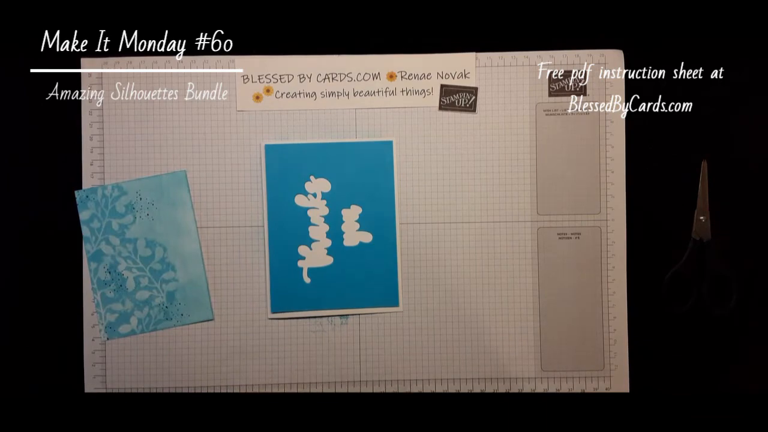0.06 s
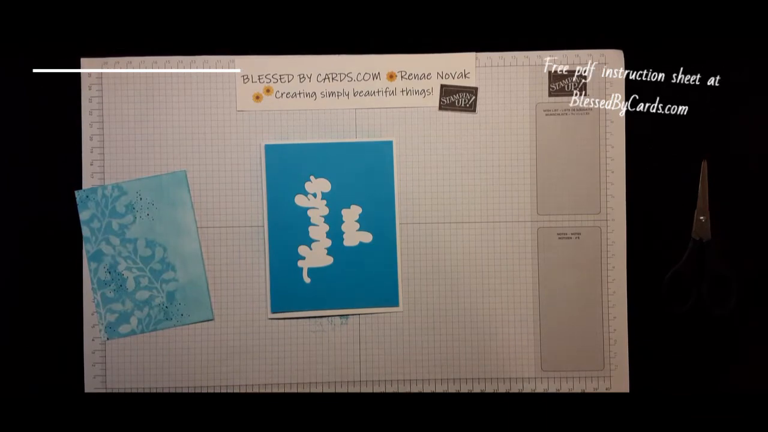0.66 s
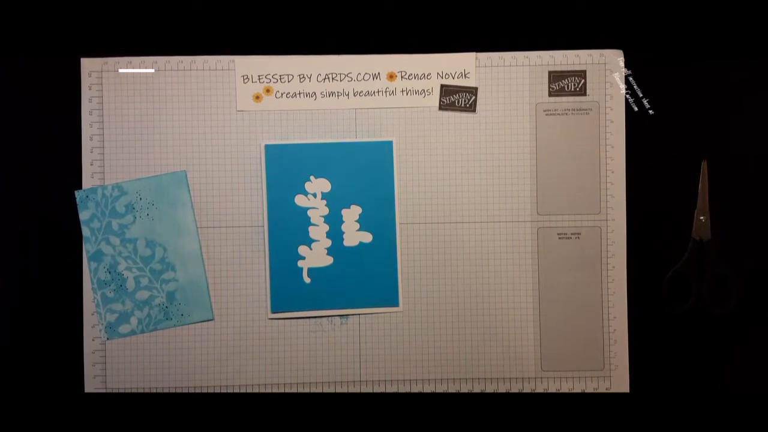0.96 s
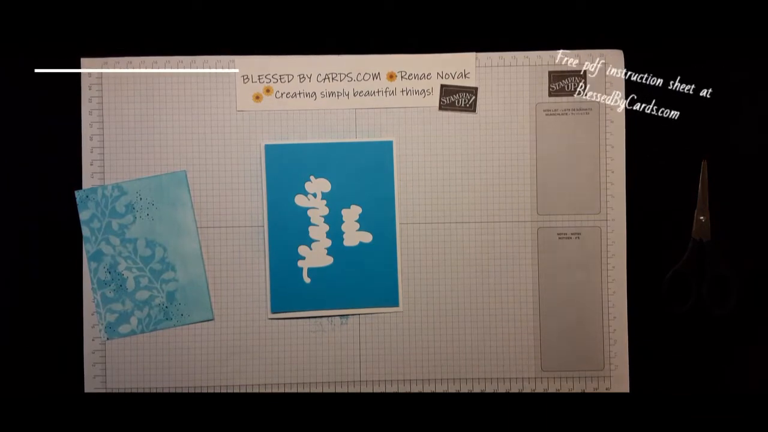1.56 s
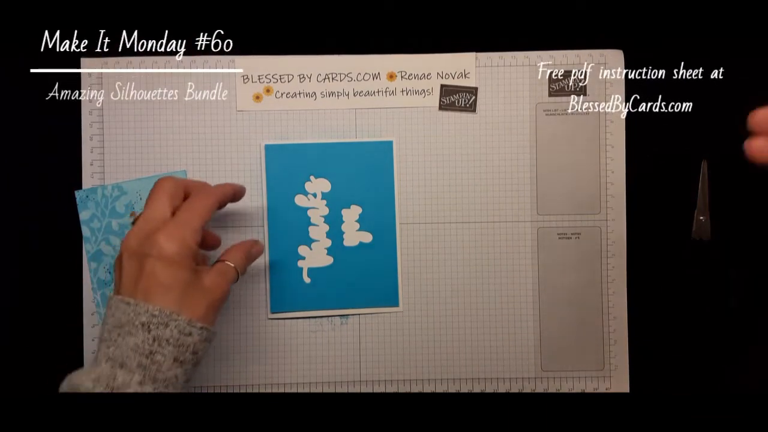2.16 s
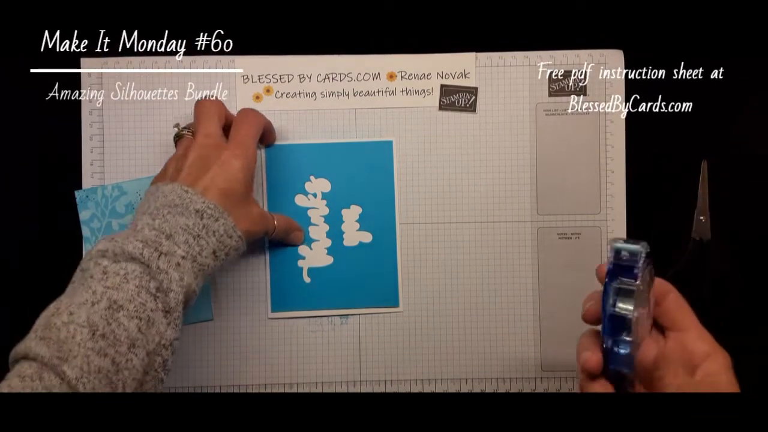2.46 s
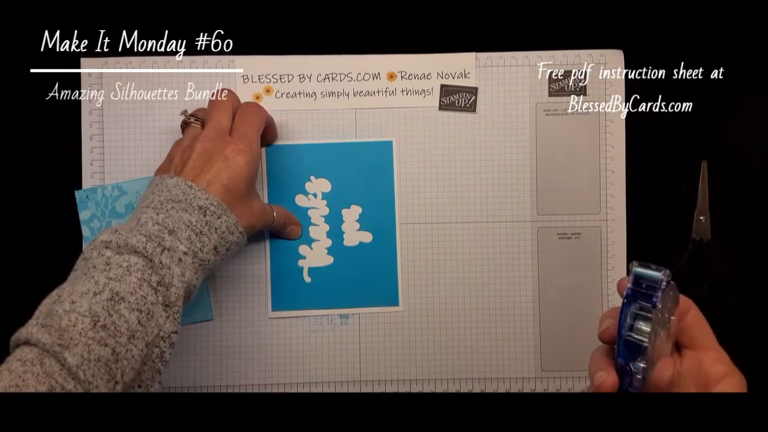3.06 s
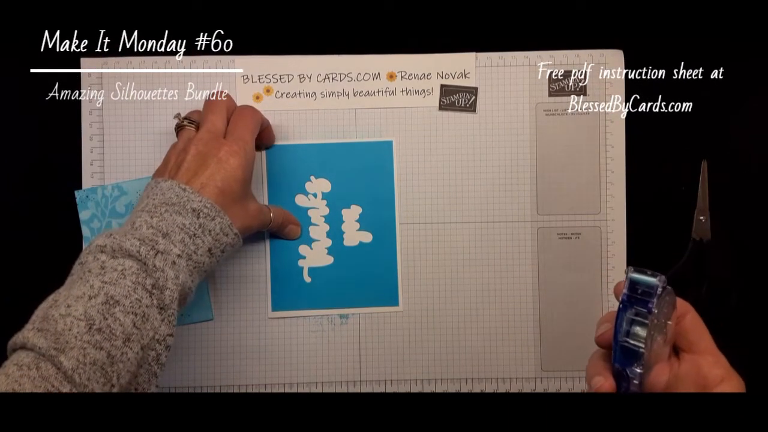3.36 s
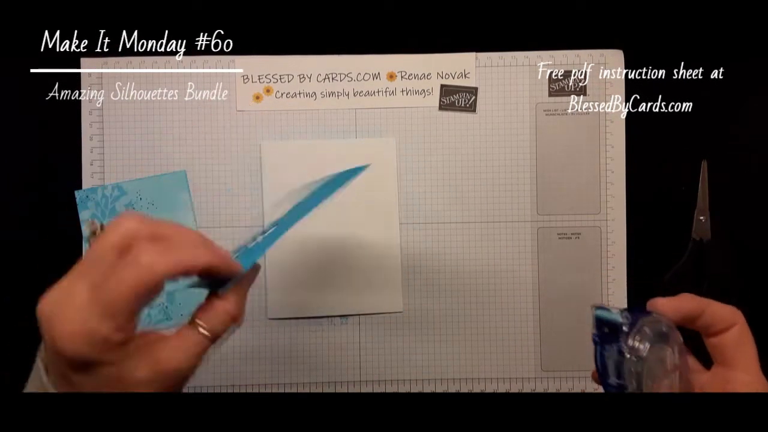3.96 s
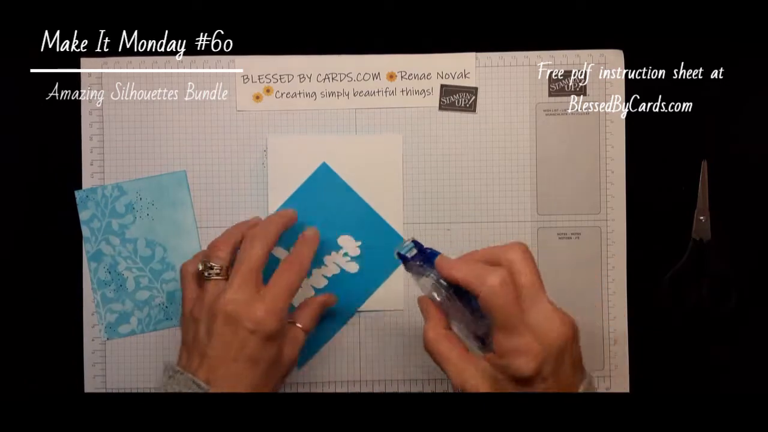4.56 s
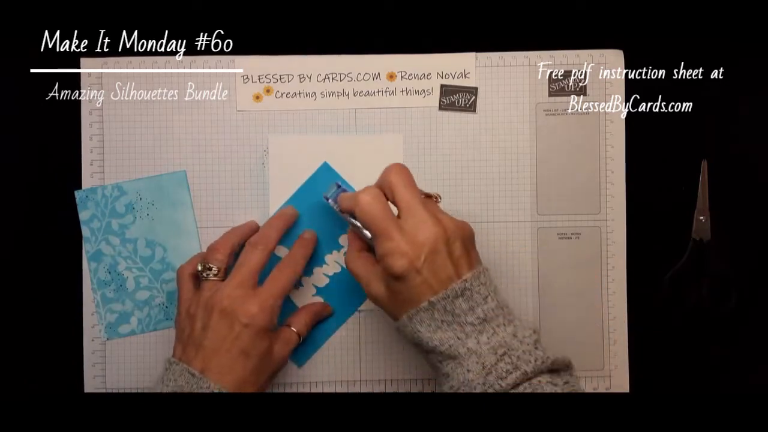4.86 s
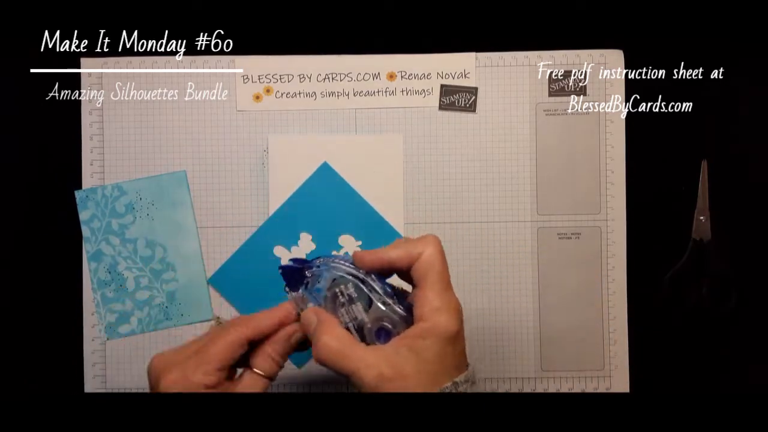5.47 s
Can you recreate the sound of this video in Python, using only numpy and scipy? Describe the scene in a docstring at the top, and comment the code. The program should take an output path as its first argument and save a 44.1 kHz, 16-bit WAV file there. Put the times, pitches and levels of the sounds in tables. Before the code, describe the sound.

After a short clatter on a desk come soft paper handling, light clicks and one sharp plastic snap, with an engine humming faintly outside.

```python
"""A hard object clatters onto a desk and rings its modes, during paper crafting in a small room.
A sleeve brushes the mat and cardstock slides off a card: grainy noise from fibres catching and letting go.
Card, fingernails and a plastic tape runner click; its roller whirs, then it snaps close to the microphone.
An engine drones outside throughout, in harmonics of its firing rate, over faint room tone."""
import sys
import numpy as np
from scipy import signal
from scipy.fft import rfft, irfft
from scipy.io import wavfile
from scipy.ndimage import uniform_filter1d

SR = 44100
rng = np.random.default_rng(int(sys.argv[2]) if len(sys.argv) > 2 else 0)


def put_to_file(sound):
    """Save the sound as 16-bit audio at rate SR, in the file named by the first command-line argument."""
    columns = np.atleast_2d(sound).T  # one column per channel
    safe = np.clip(columns, -1, 1)
    whole_steps = np.round(safe * 32767)
    wavfile.write(sys.argv[1], SR, whole_steps.astype(np.int16))


N = 243431
T = np.arange(N) / SR
RING_T = T[:SR * 2 // 5]

# Table levels are relative; each source adds its own gain.
# engine speed (time [s], firing rate [Hz])
FIRING_RATE = [(0, 87.3), (0.3, 87.24), (1.05, 86.55), (1.3, 90.3), (2.0, 89.8), (2.4, 90.74), (2.9, 90.42),
               (4.0, 91.19), (5.5, 91)]
# strong engine harmonics (time [s], first [dB], third [dB], fourth [dB])
ENGINE_HARMONICS = [(0, -65.5, -55, -66.5), (0.28, -65.5, -43.5, -73.5), (0.45, -70, -47, -60.5),
                    (1.06, -68.5, -49, -56.5), (1.38, -66, -53, -58), (1.5, -56, -59, -49),
                    (1.99, -60.5, -56, -50), (2.13, -61, -53, -63.5), (2.34, -57.5, -52, -50.5),
                    (2.58, -68, -51.5, -56), (2.82, -78.5, -53.5, -50), (3.07, -65, -51, -53.5),
                    (4.25, -74, -51, -50), (4.41, -70.5, -60.5, -60), (5.0, -68, -52, -49),
                    (5.12, -76, -58, -57.5), (5.27, -72, -58.5, -43.5), (5.5, -63, -49.5, -62.5)]
# weaker engine lines (multiple of firing rate, level re mean of third and fourth [dB])
ENGINE_LINES = [(1.25, -12.5), (2.5, -24.5), (2.75, -8.5), (3.25, -12), (5, -25), (6, -17.5), (7, -31),
                (8, -27.5), (9, -31)]
# steady background noise spectrum, with a broad low hump around 260 Hz (frequency [Hz], level [dB])
AIR_SPECTRUM = [(30, -23.5), (60, -5), (100, -1), (160, -6), (260, -1), (380, -7), (500, -13), (800, -23),
                (1300, -34), (3000, -39.5), (7700, -37.5), (9700, -42), (13300, -34), (16000, -42)]

# strokes (start [s], length [s], level [dB], swell [dB])
BRUSHES = [(0.0, 0.13, -74.5, -7), (0.5, 0.13, -65.5, 5), (0.8, 0.13, -80.5, -10), (1.22, 0.12, -71, 0.5),
           (1.36, 0.048, -60, 6), (1.46, 1.14, -70, 0), (2.68, 0.2, -79, 12), (3.78, 0.16, -73.5, 20),
           (3.98, 0.249, -62, 5), (4.255, 0.074, -52, 2.5), (4.42, 0.205, -74, -3), (4.655, 0.04, -61, -5),
           (4.74, 0.16, -71.5, 0), (4.915, 0.017, -60, 3), (5.13, 0.088, -68.5, -1),
           (5.312, 0.025, -61.5, 0), (5.35, 0.091, -64.5, 27)]  # sleeve, hand and card, light on the mat
DRAGS = [(0.0, 0.11, -76.5, -13), (0.6, 0.04, -48, -8), (0.83, 0.27, -59.5, -14.5), (1.17, 0.45, -66, -2.5),
         (1.6, 2.02, -76.5, -1), (3.65, 0.751, -69.5, 2), (4.42, 0.27, -70.5, 3.5), (4.69, 0.28, -58, 0.5),
         (4.98, 0.505, -64, -2.5)]  # card or hand, pressed on the mat
SLIDES = [(3.635, 0.12, -49, 13)]  # cardstock pulled off the card
ROLLS = [(4.75, 0.19, -72, 5)]  # tape runner's roller
# friction spectra (frequency [Hz], level [dB])
BRUSH_SPECTRUM = [(1180, -18.5), (2000, -10.5), (2220, -4), (3610, -5.5), (7910, -1), (10100, -12),
                  (13600, -1), (16000, -9.5)]
DRAG_SPECTRUM = [(380, -27.5), (650, 2.5), (672, -1), (1050, -2), (1270, -7), (1480, -2), (1870, -9.5),
                 (2810, -17), (4600, -20.5), (5730, -23), (9000, -23), (11700, -58), (19800, -120)]
SLIDE_SPECTRUM = [(590, -21.5), (1000, -23), (2030, -15.5), (3230, -9.5), (3460, -5.5), (6470, -1.5),
                  (10100, -9.5), (12700, -4.5), (16000, -5.5)]

# hard blows on the desk (time [s], level [dB], tilt [dB/octave])
KNOCKS = [(0.448, -19.5, 0.5), (0.487, -27.5, 1), (0.586, -39, 5), (0.602, -21, -0.5), (0.661, -18.5, -0.5),
          (0.6742, -14, 2), (0.681, -4.5, 0.5), (0.6848, -5.5, -4), (0.6861, -4, 3.5), (0.6895, -4.5, -3)]
# soft, heavy bumps on the desk (time [s], level [dB])
BUMPS = [(0.453, -26), (0.553, -22), (0.563, -62), (0.682, -20), (0.698, -20), (0.731, -12.5),
         (0.759, -20.5), (1.168, -37.5), (1.288, -37), (1.432, -34), (1.529, -36), (4.235, -33.5)]
# desk modes (frequency [Hz], level [dB], t60 before hand damping [s])
DESK_MODES = [(113, 0.5, 0.33), (228.1, -4, 0.14), (331, 1, 0.16), (408, -5.5, 0.32), (471.4, -8.5, 0.37),
              (683.7, -6.5, 0.3), (845, -6, 0.31), (990, -12.5, 0.12), (1525, -14, 0.56), (1669, -29, 0.26),
              (1868, -13, 0.22), (2020, -20.5, 0.21)]
# card, nail and case clicks (time [s], level [dB], ring [Hz], treble [dB], left minus right [dB])
TAPS = [(1.4135, -35, 2780, -9.5, 2.5), (1.5877, -55.5, 1546, -1, 11), (1.918, -51.5, 4613, -5, 3.5),
        (1.9539, -54, 4340, -7, 1.5), (2.4461, -50.5, 1997, -13.5, 5), (2.7006, -58.5, 2430, -20.5, 7),
        (2.7372, -49.5, 1100, -25.5, 3), (2.8058, -35.5, 1302, -7.5, 4.5), (2.8176, -39.5, 1590, -19, -3),
        (2.99, -44.5, 1990, -28.5, 4), (3.5324, -54.5, 3139, -12.5, 7.5), (3.755, -41.5, 1930, -16, 6),
        (3.7838, -40.5, 1550, -24, 8), (3.9051, -52, 1564, -16, 5), (3.9743, -51.5, 1665, -1, 6.5),
        (4.0302, -47.5, 3665, -9.5, 6.5), (4.1961, -46.5, 3370, -12, 9), (4.2344, -21.5, 2360, -13.5, 3.5),
        (4.3941, -42, 3850, 9, 5.5), (4.4364, -43.5, 2350, -20, 1.5), (4.6365, -50, 1285, -12.5, 7.5),
        (4.6819, -40, 1740, -17, 3), (5.1419, -35, 1702, -22, 2), (5.1845, -50, 2630, -11, 8),
        (5.21, -52, 1640, -15, 0), (5.319, -38, 2500, -3, 5.5)]
# tape runner's snap (time [s], level [dB])
SNAPS = [(5.4275, -10)]
# contact spectra (frequency [Hz], level [dB])
KNOCK_SPECTRUM = [(88, -38.5), (150, -14.5), (368, -0.5), (589, -8.5), (871, -7.5), (1170, -17.5),
                  (1560, -10.5), (2350, -23), (2900, -22.5), (3620, -26.5), (5460, -28), (8200, -31.5),
                  (10200, -45), (12400, -36.5), (16000, -40)]
TAP_SPECTRUM = [(350, -34.5), (600, -4.5), (1290, -3), (1930, -5.5), (2210, -5), (3250, -4), (4050, -0.5),
                (4520, -4), (8000, -4.5), (10000, -18), (12500, -10), (16000, -17)]
SNAP_SPECTRUM = [(410, -22), (700, -23), (922, -2), (1120, -27), (1460, 1), (2240, 1), (2850, 0.5),
                 (3900, -7.5), (7290, -2.5), (10300, -2.5), (13100, 8), (16000, -5)]
# room decay (frequency [Hz], t60 [s])
ROOM_T60 = [(100, 0.14), (400, 0.3), (1500, 0.26), (5000, 0.23), (14000, 0.11)]


def undb(db):
    """Decibels to gain."""
    return 10 ** (np.asarray(db) / 20)


def unit_rms(x):
    """Scale to rms 1."""
    return x / np.sqrt(np.mean(x ** 2))


def unit_hit(x):
    """Scale a stereo hit to the energy of 1 ms at rms 1."""
    return x / np.sqrt(np.sum(x ** 2) / 2 / (SR / 1000))


def at_time(rows, column=1):
    """One column of a timed table at every sample."""
    rows = np.asarray(rows)
    return np.interp(T, rows[:, 0], rows[:, column])


def at_hz(rows, hz):
    """Table value on a log-frequency axis."""
    table_hz, value = np.transpose(rows)
    return np.interp(np.log(hz + 1), np.log(table_hz), value)


def colour(x, spectrum, tilt_db_oct=0):
    """Minimum-phase filter with the given spectrum, tilted about 2.5 kHz."""
    size = 4096
    hz = np.arange(size // 2 + 1) * SR / size
    gain_db = at_hz(spectrum, hz) + tilt_db_oct * np.log2(np.maximum(hz, 500) / 2500)
    cepstrum = irfft(np.log(undb(gain_db)))
    cepstrum[1:size // 2] *= 2
    cepstrum[size // 2 + 1:] = 0
    response = irfft(np.exp(rfft(cepstrum)))
    return signal.fftconvolve(np.atleast_2d(x), response[None], axes=1)[:, :x.shape[-1]]


def band(x, lo_hz, hi_hz, order=2):
    """Butterworth band-pass."""
    sos = signal.butter(order, [lo_hz, min(hi_hz, SR * .48)], "band", fs=SR, output="sos")
    return signal.sosfilt(sos, x)


def decay(t60_s):
    """Exponential envelope."""
    return np.exp(-np.log(1000) * RING_T / t60_s)


def wander(rate_hz):
    """Smooth random drift, rms 1."""
    span = int(SR / rate_hz)
    steps = np.repeat(rng.standard_normal(N // span + 1), span)
    return unit_rms(uniform_filter1d(uniform_filter1d(steps, span), span)[:N])


def pan(db):
    """Stereo gains for a left-minus-right level."""
    return undb(np.array([[db], [-db]]) / 2)


def add(out, time_s, sound):
    """Mix a sound in at time_s."""
    start = int(time_s * SR)
    out[:, start:start + sound.shape[1]] += sound[:, :N - start]


def stereo_noise(samples=N):
    """White noise, independent at each ear."""
    return rng.standard_normal((2, samples))


def engine():
    """Engine through the wall: shaft-locked harmonics, side lines from uneven cylinders, throbbing rumble."""
    firings = np.cumsum(at_time(FIRING_RATE) * (1 + .002 * wander(11))) / SR
    first_db, third_db, fourth_db = (at_time(ENGINE_HARMONICS, column) for column in (1, 2, 3))
    load_db = (third_db + fourth_db) / 2
    strong = [(1, first_db), (3, third_db), (4, fourth_db)]
    lines = [(order, db + 2.1 * wander(9)) for order, db in strong]
    lines += [(order, load_db + db + 1.2 * wander(5.2)) for order, db in ENGINE_LINES]
    drone = sum(np.sqrt(2) * undb(db) * np.cos(2 * np.pi * order * firings) for order, db in lines)
    throb = 1 + 0.42 * np.cos(2 * np.pi * firings / 4)  # four firings per cycle
    rumble = unit_rms(band(rng.standard_normal(N) + .45 * stereo_noise(), 245, 375, order=4))
    return pan(4.5) * (undb(0.98) * drone + undb(load_db - 3) * throb * rumble)


def room_tone():
    """Steady air: bass common to both ears, hiss independent."""
    bass = band(colour(rng.standard_normal(N), AIR_SPECTRUM), 45, 600, order=1)
    hiss = band(colour(stereo_noise(), AIR_SPECTRUM), 220, 20000, order=1)
    return unit_rms(bass + 1.3 * hiss) * undb(-57.5) * pan(1.4)


def strokes(rows):
    """Stroke envelope: quick rise, even swell or ease, quick fall."""
    attack_s, release_s = 0.04, 0.038  # per 20 dB
    gain = np.zeros(N)
    for start_s, length_s, db, swell_db in rows:
        progress = np.clip((T - start_s) / length_s, 0, 1)
        before = np.maximum(start_s - T, 0) / attack_s
        after = np.maximum(T - start_s - length_s, 0) / release_s
        gain = np.maximum(gain, undb(db + swell_db * (progress - .5) - 20 * (before + after)))
    return gain


def friction(spectrum, grain_db):
    """Fibres catch and let go: dense grains of uneven size."""
    grains = stereo_noise() * undb(grain_db * wander(550) + 0.43 * wander(45))
    return unit_rms(colour(grains, spectrum))


def rubbing():
    """Cardstock slides off the card; sleeve, hand and card brush and drag on the mat."""
    slide = friction(SLIDE_SPECTRUM, grain_db=0) * strokes(SLIDES)
    brush = friction(BRUSH_SPECTRUM, grain_db=2) * strokes(BRUSHES) * undb(1.3 * wander(30))
    drag = friction(DRAG_SPECTRUM, grain_db=1.5) * strokes(DRAGS)
    return slide * pan(3.9) + (brush + drag) * pan(1.6)


def crack(t60_s, spike):
    """Contact: one sharp pulse, then a fast-dying scatter, different at each ear."""
    size = 4096
    scatter = stereo_noise(size) * decay(t60_s)[:size]
    scatter /= np.sqrt(np.sum(scatter ** 2, axis=1, keepdims=True))
    scatter[:, 0] += spike
    return scatter / np.hypot(1, spike)


def desk_ring(cutoff_hz, t60_scale, push_s):
    """Desk modes: a soft push omits the high ones, a resting hand shortens the ring."""
    ring = 0
    for hz, db, t60_s in DESK_MODES:
        phase = rng.standard_normal((2, 1)) * np.clip(hz / 400 - .4, 0, 2)  # high modes differ per ear
        gain = undb(db) / np.hypot(1, (hz / cutoff_hz) ** 3)
        ring = ring + gain * decay(t60_s * t60_scale) * np.sin(2 * np.pi * hz * RING_T + phase)
    ring *= np.sin(np.pi / 2 * np.minimum(RING_T / push_s, 1)) ** 2
    return ring / np.abs(ring).max()


def desk_clatter():
    """An object touches, tips and lands on the desk; hands bump the top."""
    out = np.zeros((2, N))
    for time_s, db, tilt_db_oct in KNOCKS:
        hit = unit_hit(colour(crack(t60_s=0.047, spike=0.49), KNOCK_SPECTRUM, tilt_db_oct))
        hit[0] = np.roll(hit[0], 17)  # left ear is further away
        ring = desk_ring(cutoff_hz=2000, t60_scale=0.57, push_s=0.0035)
        add(out, time_s, undb(db + 1.5) * band(hit, 110, 12500, order=1))
        add(out, time_s, undb(db - 11.5) * pan(6.5) * ring)
    bump = desk_ring(cutoff_hz=407, t60_scale=0.59, push_s=0.0086) * pan(5.5)
    for time_s, db in BUMPS:
        add(out, time_s, undb(db) * bump)
    return band(out, 85, 20000, order=3)  # little radiation below the lowest mode


def taps():
    """Light clicks: a tick plus the short ring of the touched spot; dull taps are mostly ring."""
    out = np.zeros((2, N))
    for time_s, db, ring_hz, treble_db, pan_db in TAPS:
        hardness = np.clip(1.07 + treble_db / 28, .05, 1)
        contact = crack(t60_s=0.078, spike=0.62 * hardness)
        tick = unit_hit(colour(contact, TAP_SPECTRUM, tilt_db_oct=.22 * (treble_db + 5)))
        ring = unit_hit(band(crack(t60_s=0.034, spike=0.67), ring_hz / 1.2, ring_hz * 1.24))
        add(out, time_s, undb(db) * pan(pan_db) * (undb(2) * hardness * tick + undb(-1.5) * ring))
    return out


def runner_whir():
    """The tape runner's roller turns: a narrow band of noise."""
    centre_hz, half_width_hz = 5647, 220
    whir = unit_rms(band(stereo_noise(), centre_hz - half_width_hz, centre_hz + half_width_hz))
    return whir * strokes(ROLLS) * pan(1.6)


def runner_snap():
    """The tape runner snaps: pressure pop at the left ear, click, bright buzz from the case."""
    out = np.zeros((2, N))
    for time_s, db in SNAPS:
        click = unit_hit(colour(crack(t60_s=0.031, spike=1), SNAP_SPECTRUM, tilt_db_oct=-0.5))
        buzz = unit_rms(colour(stereo_noise(len(RING_T)), SNAP_SPECTRUM)) * decay(0.24)
        pop_low = np.sin(2 * np.pi * 270 * RING_T - np.pi / 5) * decay(0.015)
        pop_high = undb(-5.5) * np.sin(2 * np.pi * 1300 * RING_T) * decay(0.0064)
        add(out, time_s + 0.00065, undb(db - 12.5) * pan(30.2) * (pop_low - pop_high))
        add(out, time_s + 0.00065, undb(db - 18.5) * pan(1.67) * buzz)
        add(out, time_s + 0.0024, undb(db - 8.5) * pan(7.9) * click)
    return out


def room_echo(x):
    """Diffuse small-room reflections in octave bands, longest in the midrange."""
    tail = 0
    for lo_hz in 60 * 2. ** np.arange(9):
        t60_s = at_hz(ROOM_T60, lo_hz * np.sqrt(2))
        tail = tail + band(stereo_noise(len(RING_T)), lo_hz, 2 * lo_hz) * decay(t60_s)
    tail *= np.clip((RING_T - .003) / 0.0028, 0, 1)  # 3 ms pre-delay, then fade-in
    tail /= np.sqrt(np.sum(tail ** 2) / 2)
    return signal.fftconvolve(x, tail, axes=1)[:, :N]


def scene():
    """Handling sounds with room echo, plus the dry snap, engine and room tone."""
    knocks, clicks = desk_clatter(), taps()
    rustle = rubbing() + runner_whir()
    echo = room_echo(undb(-8) * knocks + undb(-8.5) * clicks + undb(-10) * rustle)
    return knocks + clicks + rustle + runner_snap() + echo + engine() + room_tone()


def record(dry):
    """Soft-clip the peaks, then low-pass."""
    ceiling, cutoff_hz = 1.1, 16000
    lowpass = signal.ellip(10, .2, 80, cutoff_hz, fs=SR, output="sos")
    return signal.sosfilt(lowpass, ceiling * np.tanh(dry / ceiling))


dry = scene()
out = record(dry)
put_to_file(out)
```